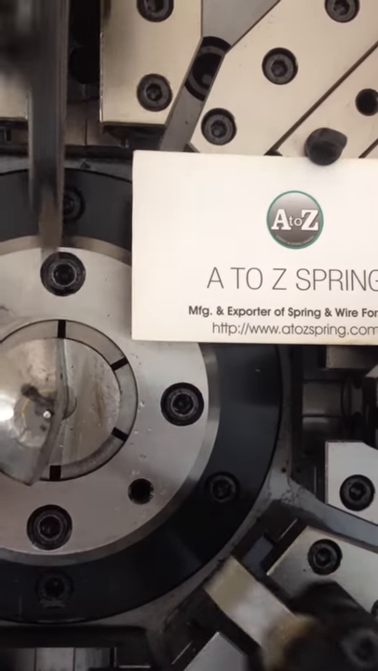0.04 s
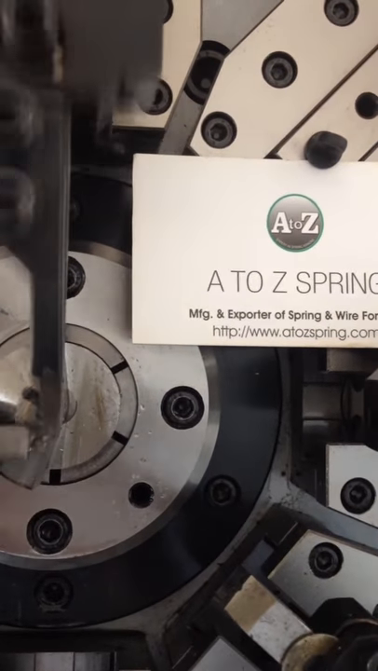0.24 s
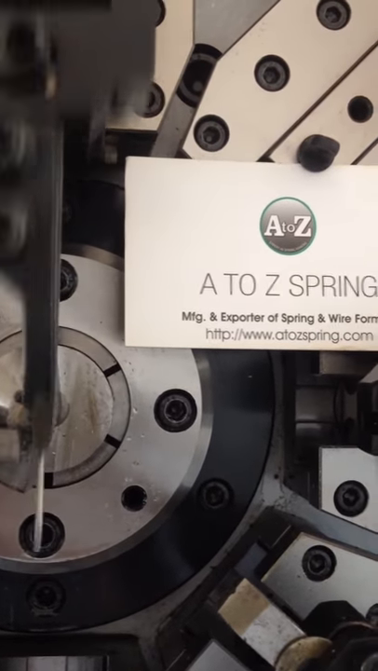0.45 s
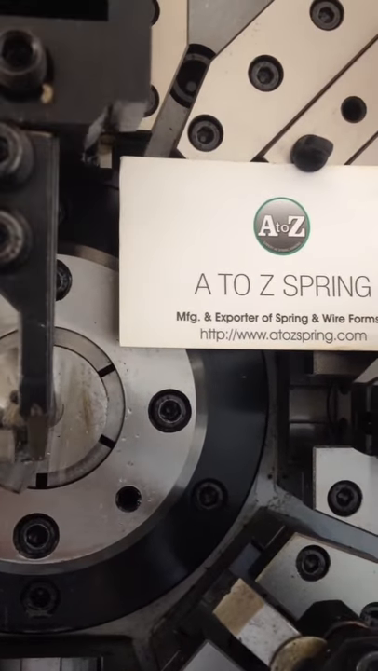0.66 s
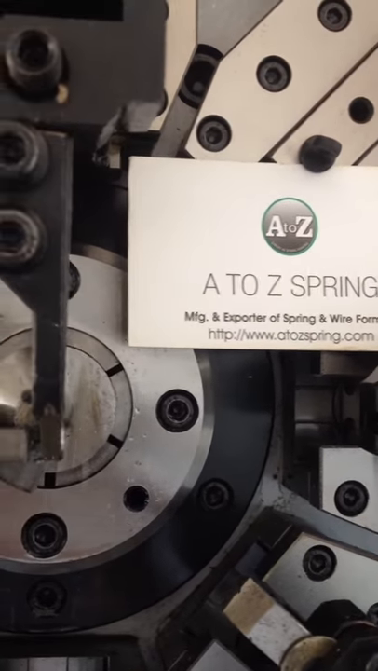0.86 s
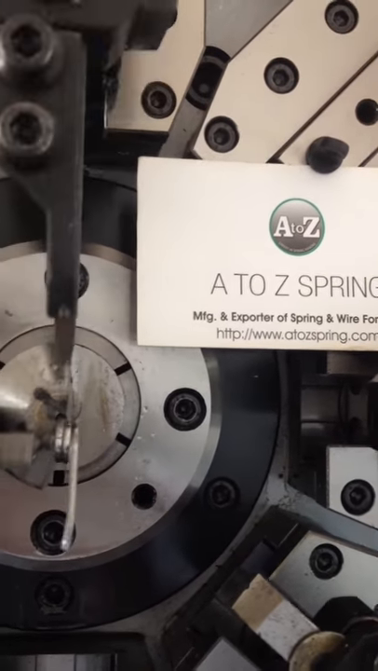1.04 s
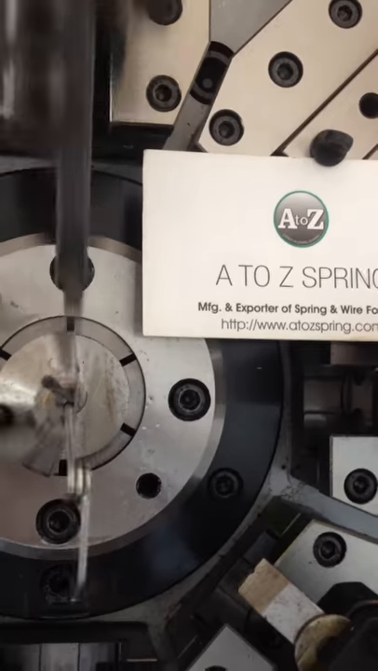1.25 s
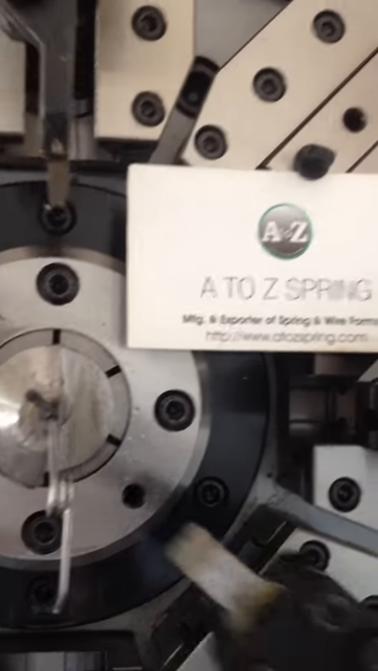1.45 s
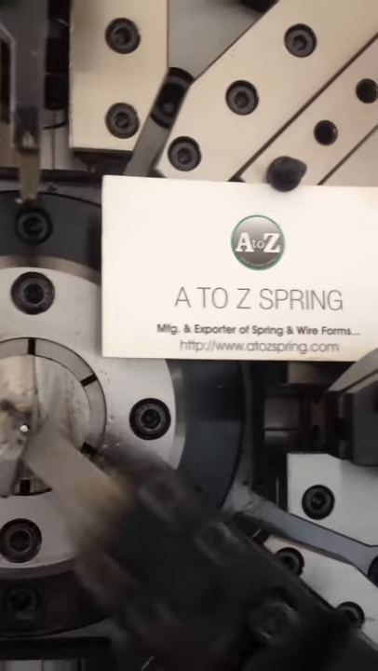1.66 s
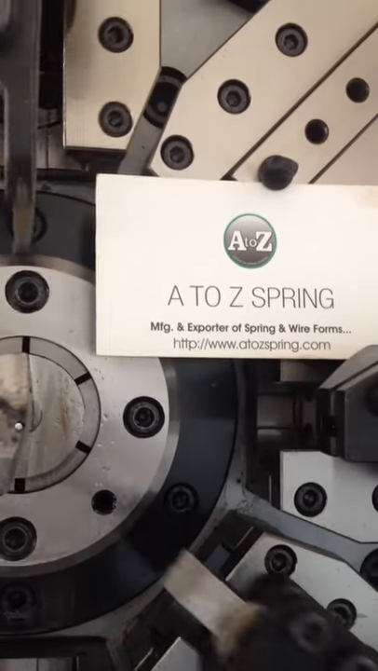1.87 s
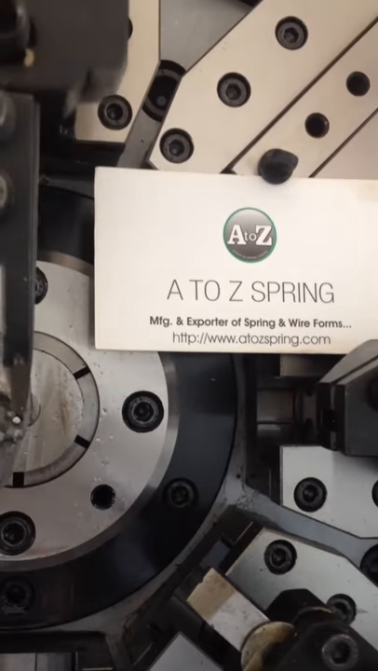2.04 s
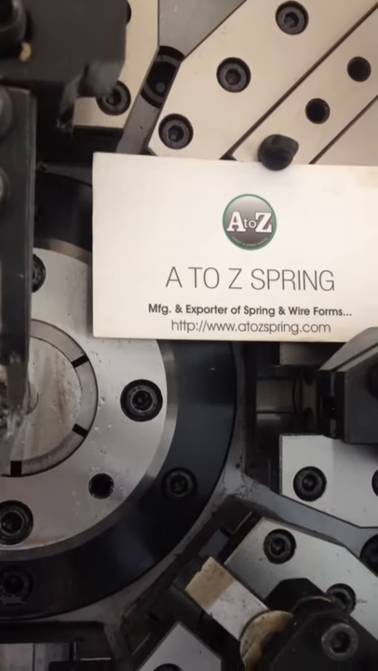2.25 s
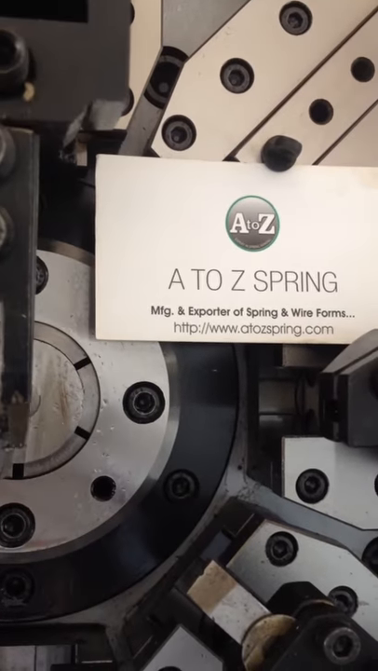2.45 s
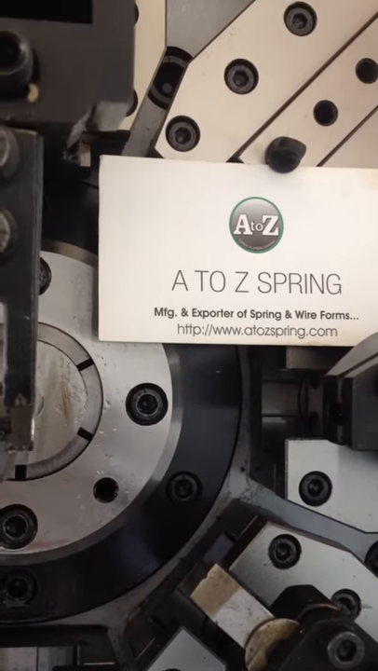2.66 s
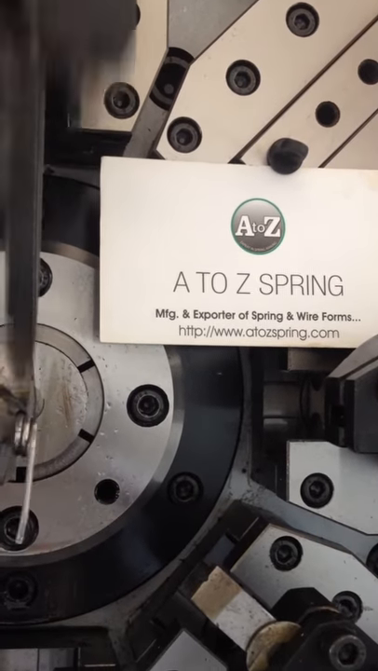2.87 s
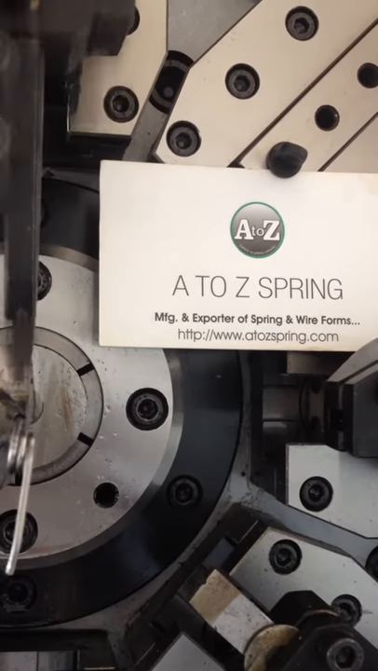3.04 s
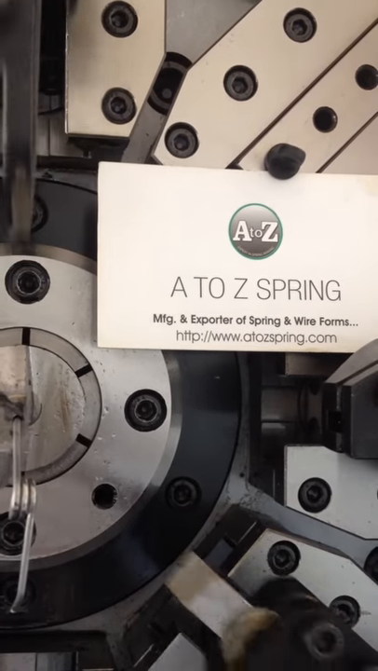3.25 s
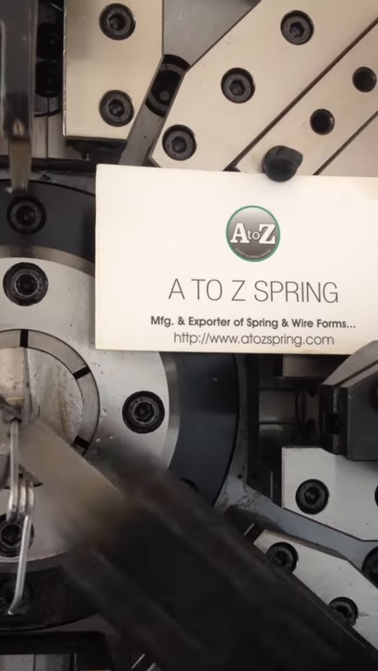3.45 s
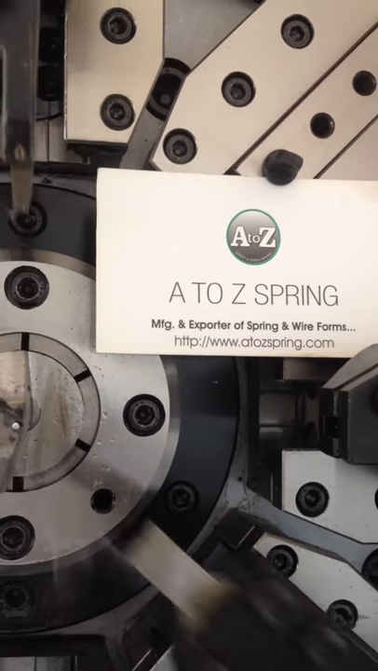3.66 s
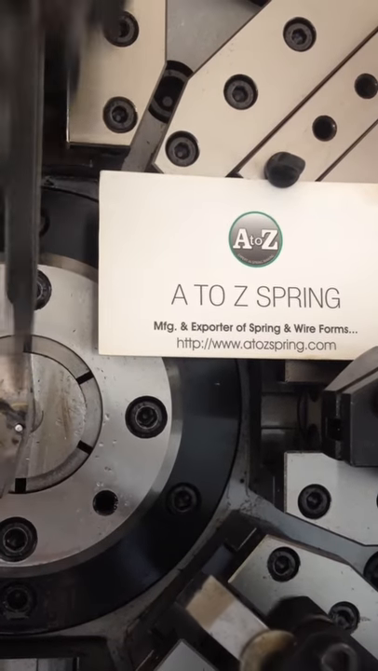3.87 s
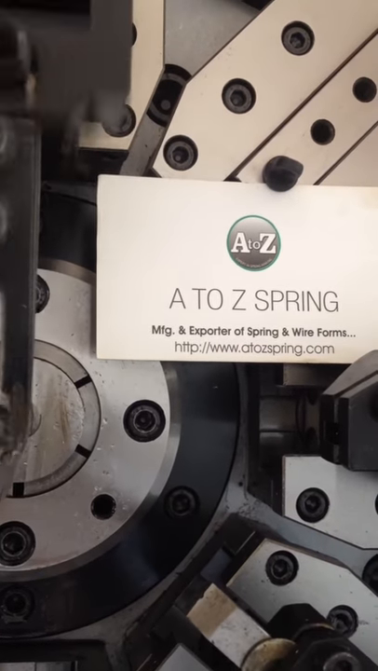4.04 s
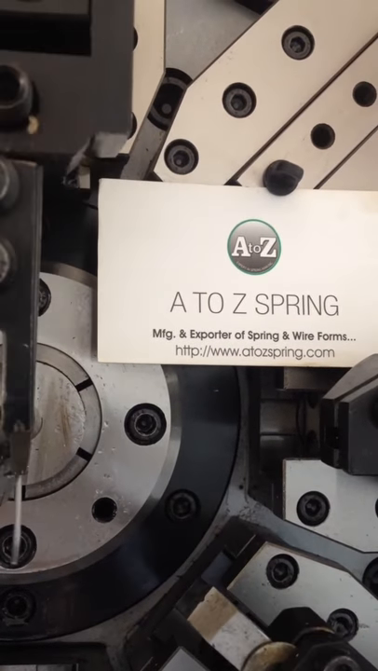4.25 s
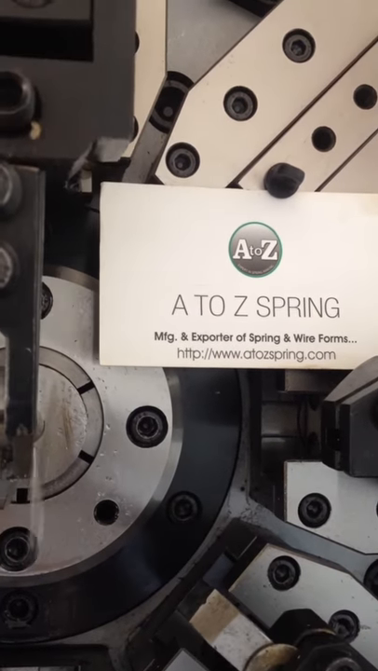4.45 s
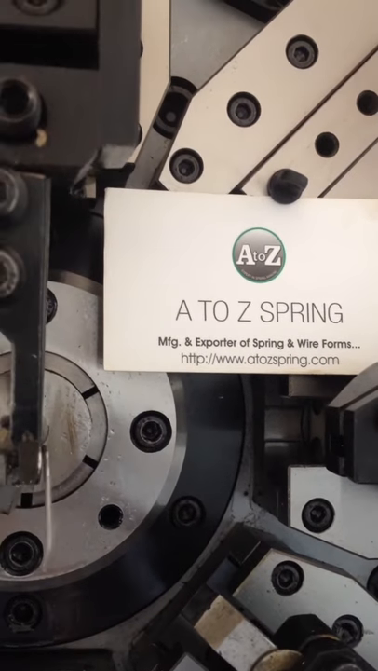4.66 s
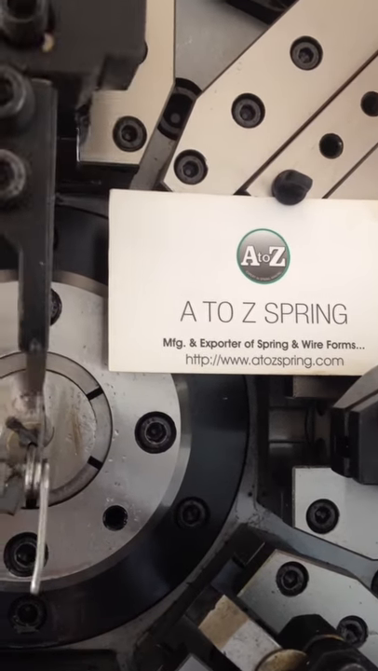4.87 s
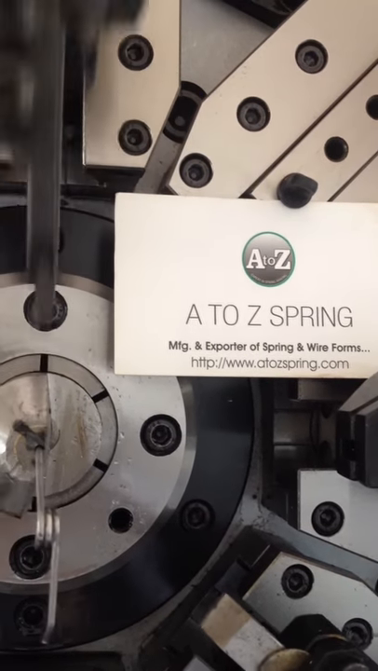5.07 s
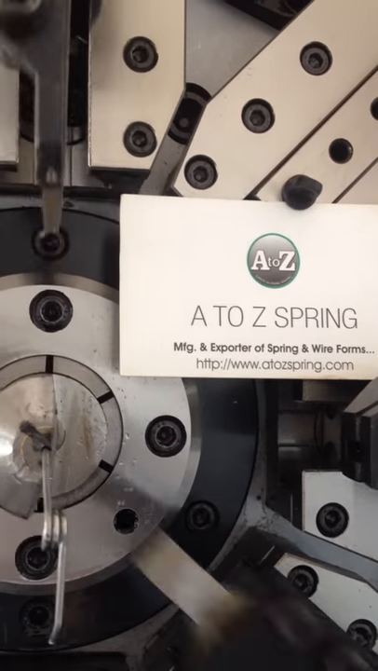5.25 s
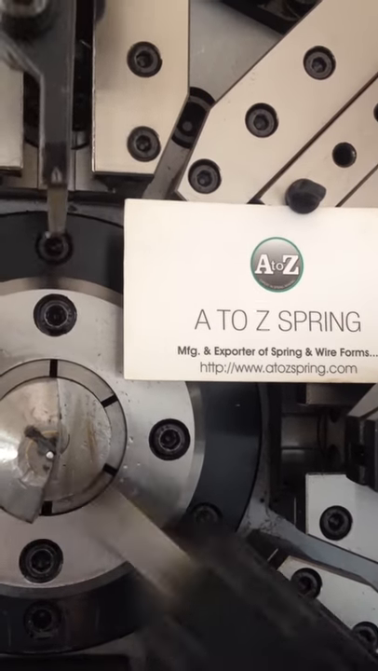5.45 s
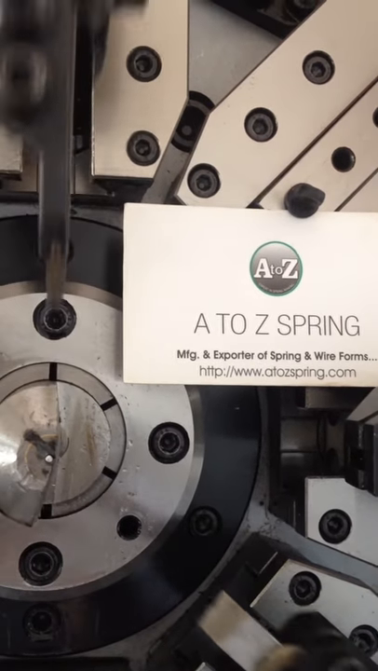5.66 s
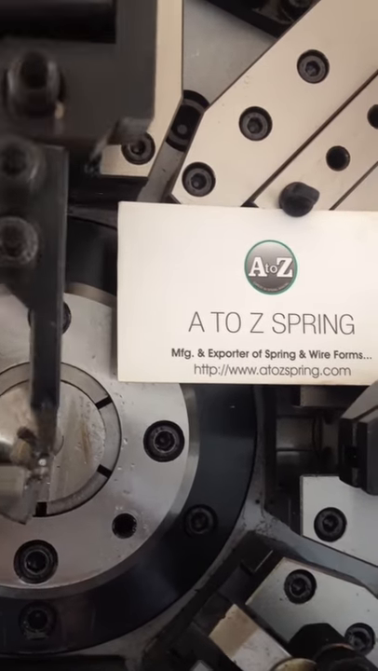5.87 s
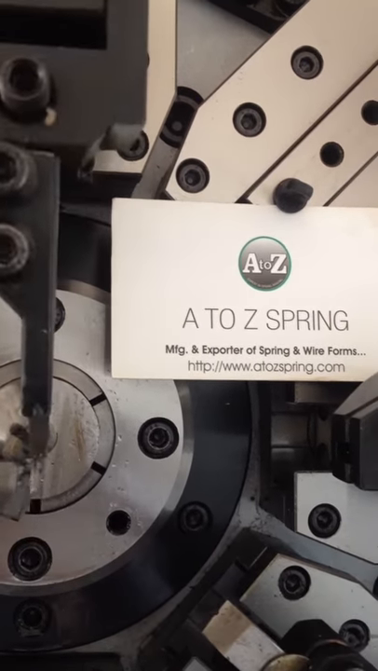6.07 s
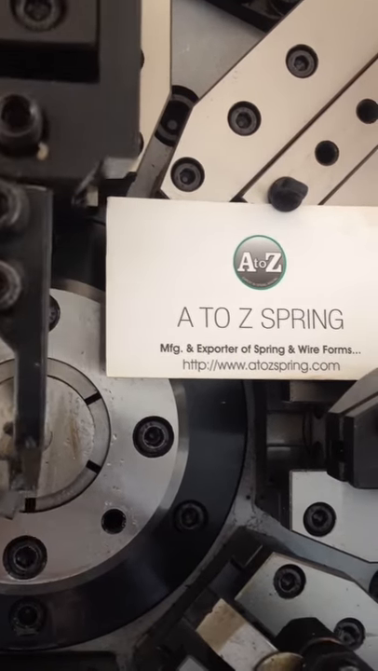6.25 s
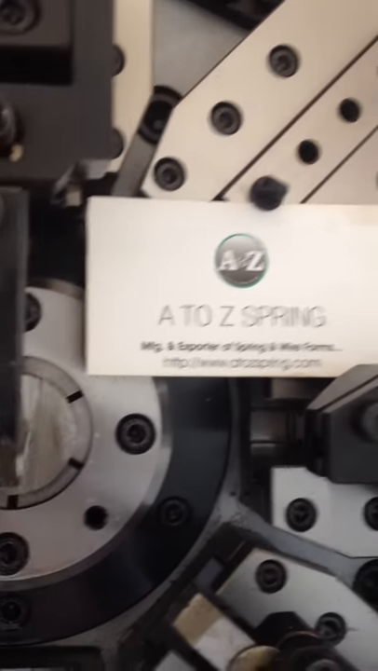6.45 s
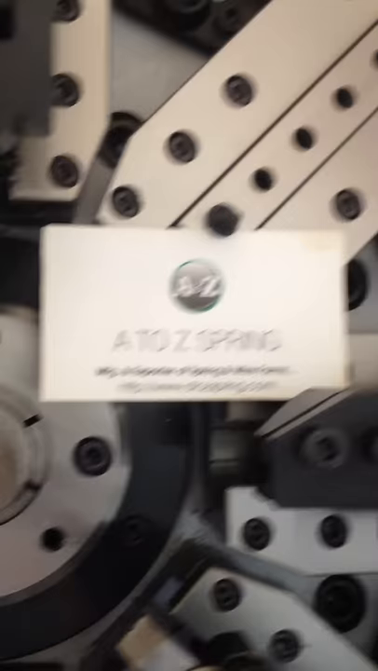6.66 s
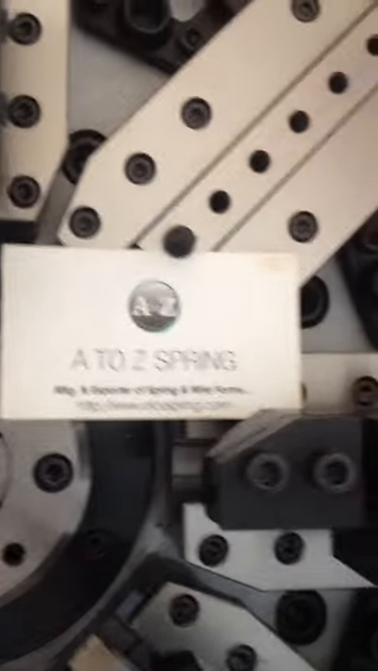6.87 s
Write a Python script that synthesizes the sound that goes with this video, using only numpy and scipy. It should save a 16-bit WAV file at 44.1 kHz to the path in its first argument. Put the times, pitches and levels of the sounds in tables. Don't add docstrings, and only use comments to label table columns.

```python
import sys
import numpy as np
from scipy import signal
from scipy.fft import rfft, irfft
from scipy.io import wavfile
from scipy.ndimage import uniform_filter1d

SR = 44100
rng = np.random.default_rng(int(sys.argv[2]) if len(sys.argv) > 2 else 0)


def how_loud(loudness_db):
    steps = np.asarray(loudness_db, float) / 20
    return 10 ** steps


def log_audio(samples):
    frames = np.atleast_2d(samples).T
    limited = np.clip(frames, -1, 1)
    pcm = np.round(limited * 32767).astype(np.int16)
    wavfile.write(sys.argv[1], SR, pcm)


N = 304731
CYCLE_S, FIRST_CUT_S = 1.88225, -.19475

# f/Hz, level/dB, time to fall 60 dB/s
CRACK_MODES = [(511, -5.5, 0.03), (790, -7, 0.069), (867, 0.5, 0.031), (1114, -7.5, 0.15),
               (2580, -24.5, 0.045), (4600, -32, 0.019), (6400, -41.5, 0.081), (6430, -52, .1),
               (7850, -43, .02), (8230, -49, 0.0099), (11600, -43, 0.01), (14600, -49, .012)]
# f/Hz, level/dB, time to fall 60 dB/s, time until full/s
FRAME_MODES = [(147.9, -17, 0.56, 0.025), (225.7, -12, 0.69, 0.016), (294.7, -9, 0.48, 0.0085),
               (312, -8.5, 0.44, 0.018), (350.4, -6, 0.42, 0.032), (414, -19.5, 0.21, .01),
               (437, -11.5, 0.3, 0.0059), (491, -14, 0.21, 0.0053), (521, -19, 0.54, 0.0066),
               (637, -33.5, 0.54, 0.0046), (757, -19.5, 0.48, .02), (808, -6, 0.15, 0.033),
               (894, -30, 0.56, 0.015), (1078, -30, 0.36, .01), (1234, -28.5, 0.37, 0.0088),
               (1462, -21.5, 0.11, 0.0058), (1580, -30.5, 0.21, .01), (1670, -39, 0.38, 0.011),
               (2080, -29.5, 0.091, .005), (2486, -33, 0.2, 0.011), (2534, -36.5, 0.26, .01),
               (2580, -43, 0.14, .01), (3500, -43, 0.074, 0.0056)]
# t/s after the blow, f/Hz, level/dB, time to fall 60 dB/s
BLOW_RETURNS = [
    (.008, 400, 1.5, 0.037),
    (.008, 3650, -29.5, 0.016),
    (.033, 830, -10.5, 0.071),
    (.038, 400, -10.5, .03),
    (0.057, 844, -9, 0.014),
]
# t/s after the blow, level/dB, time to fall 60 dB/s, time until full/s
BOOM_RETURNS = [
    (0.089, -5.5, 0.47, 0.014),
    (.125, -7.5, 0.39, 0.016),
]
# f/Hz, level/dB per Hz
RATTLE_COLOUR = [(100, -54), (160, -33), (300, -13.5), (400, -5.5), (600, -8.5), (830, -6.5), (1080, -14.5),
                 (1400, -20.5), (2500, -26.5), (3500, -35), (5000, -51.5), (7000, -49.5), (15000, -75)]
# f/Hz, time to fall 60 dB/s
HALL = [(150, 1), (400, 0.6), (1000, 0.45), (2500, .3), (6000, 0.11), (14000, 0.055)]
# t/s after the cut, level/dB, f/Hz, loss per overtone/dB
CAM_TICKS = [
    (.533, -69, 1400, 6),
    (1.436, -54, 1150, 2),
    (1.486, -70, 1510, 6),
]
# t/s after the cut, level/dB, f/Hz, time to fall 60 dB/s
CAM_THUDS = [
    (.533, -51, 830, .16),
    (.53, -42.5, 380, .16),
    (1.065, -47.5, 358, 0.27),
    (1.228, -50.5, 840, 0.13),
    (1.436, -55, 786, 0.37),
    (1.44, -44, 348, 0.44),
    (1.486, -49, 870, 0.19),
]
# t/s, level/dB, f/Hz, loss per overtone/dB
DROP_TICKS = [(2.411, -55, 1510, 2.5), (2.525, -47, 1380, 7.7), (4.100, -41.5, 1360, 7),
              (4.112, -56, 1370, 9), (4.368, -42, 1740, 6), (4.368, -35.5, 808, 2.3),
              (4.545, -52, 1600, 5.1), (6.143, -45, 1935, 4.3), (6.145, -35.5, 1440, 6),
              (6.163, -36.5, 1620, 5.2), (6.267, -49, 1490, 2.3), (6.268, -33, 550, 4),
              (6.281, -39, 1490, 4.2), (6.281, -33, 640, 5.9)]
# t/s, level/dB, f/Hz, time to fall 60 dB/s
DROP_THUDS = [(4.096, -33, 234, 0.038), (4.103, -53, 500, 0.069), (4.112, -52.5, 1100, 0.12),
              (4.372, -52.5, 890, 0.41), (4.37, -39, 298, 0.11), (6.145, -53, 852, 0.18),
              (6.163, -45.5, 800, 0.12), (6.170, -43, 280, 0.096), (6.243, -57, 805, 0.063),
              (6.268, -32.5, 250, 0.19), (6.268, -51, 880, .054), (6.281, -36, 666, 0.22)]
# t/s, level/dB, f/Hz, time to fall 60 dB/s
GEAR_GROANS = [
    (4.41, -33.5, 345, 0.26),
    (4.49, -39, 340, .35),
    (4.63, -43.5, 358, .5),
]
# t/s after the cut, level/dB
LOAD = [
    (0, 4),
    (.25, -1),
    (.45, 0.5),
    (.7, -0.5),
    (1, -1.5),
    (1.35, -1),
    (1.55, 0),
    (1.882, 0),
]
# f/Hz, level/dB per Hz
MOTOR = [(25, -3.5), (50, -6), (80, -23.5), (110, -25.5), (135, -23.5), (150, 1.5), (170, 3), (200, 8.5),
         (230, -3.5), (260, -3.5), (400, -84.5)]
# f/Hz, level/dB per Hz
GEARS = [(150, -60.5), (230, -7), (280, -4), (310, -6.5), (350, 0), (400, -12), (500, -13), (560, -18.5),
         (800, -76)]
# f/Hz, level/dB per Hz
CHATTER = [(350, -6.5), (520, -2.5), (650, 1.5), (800, -1.5), (950, -5), (1100, -11.5), (1500, -17),
           (2000, -29), (3500, -66.5)]
# f/Hz, width/Hz, level/dB
WHINES = [
    (149.6, 2.53, -42.5),
    (2824, 12, -89),
]
# f/Hz, level/dB per Hz
HISS = [(600, -32.5), (1500, 1), (2200, 6.5), (3200, 3), (4500, 2.5), (6500, -1.5), (8000, -23),
        (9800, -41.5), (11500, -3), (13000, 2.5), (15300, 6)]


def cutter():
    t = np.arange(SR // 2) / SR
    contact_s = 0.0047
    damping = how_loud(-2500 * np.maximum(t - contact_s, 0))
    blow = boom(t)
    for hz, db, t60 in CRACK_MODES:
        blow += ring(t, hz, db, t60, 0.00075) * (damping if hz < 2000 else 1)
    for hz, db, t60, full_s in FRAME_MODES:
        blow += ring(t, hz, db, t60, full_s)
    for s, hz, db, t60 in BLOW_RETURNS:
        blow += ring(t - s, hz, db, t60, 0.0014)
    blow += how_loud(-18.5) * rattle(lambda hz: read(RATTLE_COLOUR, hz), stretch=0.93, rise_s=0.0055)
    blow += how_loud(-46) * rattle(hump(5600, 9.1), stretch=0.3, rise_s=0.00065)
    out = np.zeros(N)
    for s, db in each_cycle([(0, -17.5)]):
        add(out, s, how_loud(db) * blow)
    return out


def boom(t):
    boom_hz, start_s, rise_s, stop_s, fall_s = 201.86, 0.0021, 0.0086, .07, .016
    level_db, swell_db_per_s = -4, 33.5
    rise = np.clip((t - start_s) / rise_s, 0, 1)
    stop = np.clip((t - stop_s) / fall_s, 0, 1)
    envelope = (np.sin(np.pi / 2 * rise) * np.cos(np.pi / 2 * stop)) ** 2
    out = how_loud(level_db + swell_db_per_s * t) * envelope * np.sin(2 * np.pi * boom_hz * t)
    for s, db, t60, full_s in BOOM_RETURNS:
        out += ring(t - s, boom_hz, db, t60, full_s)
    return out


def part_drops():
    return ticks(DROP_TICKS, 0.029, tail_db=-20) + thuds(DROP_THUDS, 0.0013, octave_db=22)


def cams():
    clicks = ticks(each_cycle(CAM_TICKS), 0.032, tail_db=-11.0)
    return clicks + thuds(each_cycle(CAM_THUDS), 0.015, octave_db=119.5)


def gear_groans():
    return thuds(GEAR_GROANS, 0.032, octave_db=203)


def running():
    t = np.arange(N) / SR
    load_db = np.interp((t - FIRST_CUT_S) % CYCLE_S, *np.transpose(LOAD))
    out = how_loud(-39.5 + 0.67 * load_db) * noise(MOTOR, 1.35)
    out += how_loud(-48.5 + 0.4 * load_db) * noise(GEARS, 1.8)
    out += how_loud(-55 + 1.1 * load_db) * noise(CHATTER, 0.55, size=512)
    for hz, width_hz, db in WHINES:
        keep = np.exp(-np.pi * width_hz / SR)
        waver = signal.lfilter([1], [1, -keep], rng.standard_normal((2, N)))
        whine = waver[0] * np.cos(2 * np.pi * hz * t) + waver[1] * np.sin(2 * np.pi * hz * t)
        out += how_loud(db) * evened(whine)
    return out


def microphone_hiss():
    early = np.arange(N) < 1.2 * SR
    return how_loud(-72 - 3 * early) * noise(HISS, .5, size=1024)


def ticks(rows, t60, tail_db):
    t, out = np.arange(SR // 2) / SR, np.zeros(N)
    for s, db, hz, dull_db in rows:
        ratios = 1.03 ** rng.uniform(-1.9, 1, 6) * [1, 1.18, 1.4, 1.65, 2, 2.5]
        tick = how_loud(db + tail_db) * rattle(hump(hz, 50), stretch=0.58, rise_s=0.013)
        for k, ratio in enumerate(ratios):
            tick += ring(t, hz * ratio, db - dull_db * k, t60 / ratio, 0.00099)
        add(out, s, tick)
    return out


def thuds(rows, rise_s, octave_db):
    out = np.zeros(N)
    for s, db, hz, t60 in rows:
        add(out, s, how_loud(db) * rattle(hump(hz, octave_db), t60 / read(HALL, hz), rise_s))
    return out


def ring(t, hz, db, t60, full_s=0.00029):
    t = np.maximum(t, 0)
    build_up = np.sin(np.pi / 2 * np.minimum(t / full_s, 1)) ** 2
    return how_loud(db - 60 * t / t60) * build_up * np.sin(2 * np.pi * hz * t)


def rattle(colour_db, stretch, rise_s):
    length = SR // 2
    hz, t, z = signal.stft(rng.standard_normal(length), SR, nperseg=256)
    decay = how_loud(-60 * t / (stretch * read(HALL, hz))[:, None])
    tail = signal.istft(z * decay, SR, nperseg=256)[1][:length]
    colour = how_loud(colour_db(np.fft.rfftfreq(SR, 1 / SR)))
    tail = irfft(rfft(tail, SR) * colour, SR)[:length]
    tail = tail / np.sqrt(np.mean(tail[:SR // 40] ** 2))
    rise = np.minimum(np.arange(len(tail)) / (rise_s * SR), 1)
    return tail * np.sin(np.pi / 2 * rise) ** 2


def hump(centre_hz, octave_db):
    return lambda hz: -octave_db * np.log2(hz / centre_hz + 0.02) ** 2


def noise(spectrum, patchy_db, size=2048):
    frames, hz = 4 * N // size + 5, np.fft.rfftfreq(size, 1 / SR)
    a, b, patches = rng.standard_normal((frames, len(hz), 3)).T
    patches = uniform_filter1d(patches, size=6, axis=0)
    patches = evened(uniform_filter1d(patches, size=8, axis=1))
    z = (a + 1j * b) * how_loud(read(spectrum, hz)[:, None] + patchy_db * patches)
    sound = signal.istft(z, nperseg=size, noverlap=3 * size // 4)[1]
    return evened(sound[size // 2:][:N])


def evened(x):
    return x / np.sqrt(np.mean(x ** 2) + 1e-20)


def read(points, hz):
    f, value = np.transpose(points)
    return np.interp(np.log(hz + 1), np.log(f + 1), value)


def each_cycle(rows):
    cuts = np.arange(FIRST_CUT_S, N / SR, CYCLE_S)
    return [(cut + s, *rest) for cut in cuts for s, *rest in rows]


def add(mix, s, sound):
    at = round(s * SR)
    heard = sound[max(-at, 0):]
    part = mix[max(at, 0):][:len(heard)]
    part += heard[:len(part)]


def scene():
    return (cutter() + part_drops() + cams() + gear_groans() + running())[None]


def low_pass(x):
    return signal.sosfilt(signal.butter(12, 15350, fs=SR, output="sos"), x)


def record(dry):
    bass_cut = signal.butter(3, 115, "high", fs=SR, output="sos")
    heard = signal.sosfilt(bass_cut, dry) + microphone_hiss()
    below_top = np.fft.rfftfreq(N, 1 / SR) < 15350
    heard = irfft(rfft(heard) * below_top, N)
    to_nearest_end = np.minimum(np.arange(N), np.arange(N)[::-1])
    fade = np.minimum(to_nearest_end / (.004 * SR), 1)
    return low_pass(heard * fade)


dry = scene()
out = record(dry)
log_audio(out)
```